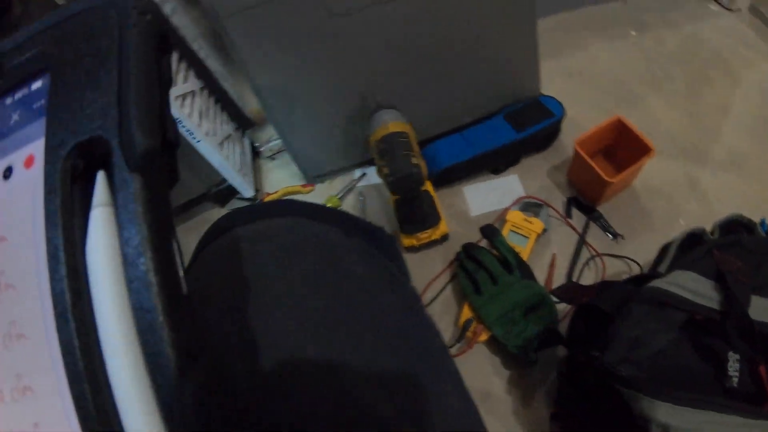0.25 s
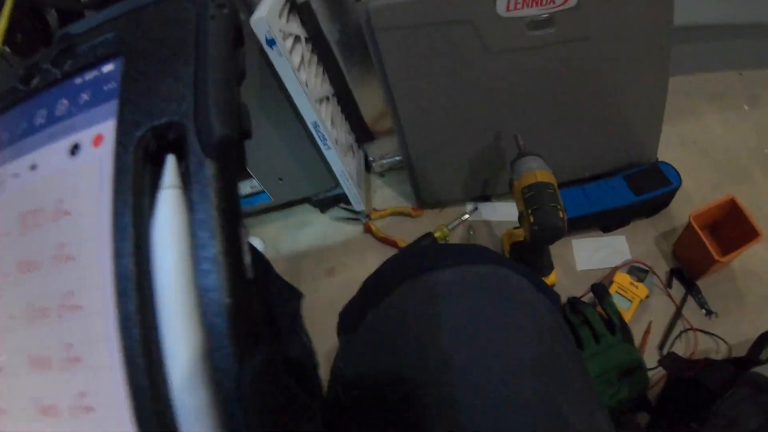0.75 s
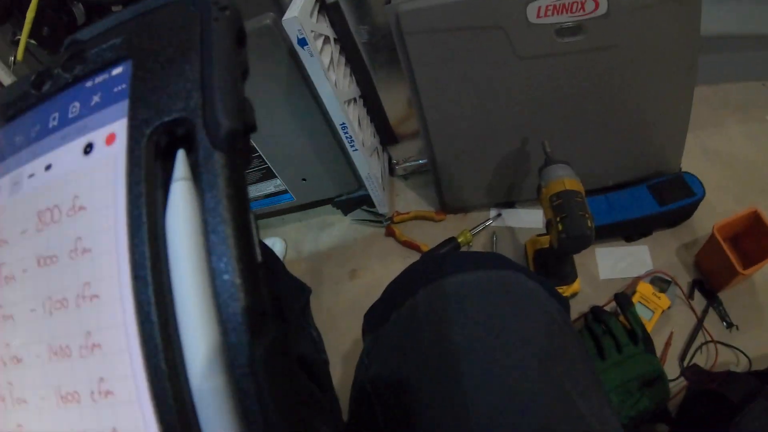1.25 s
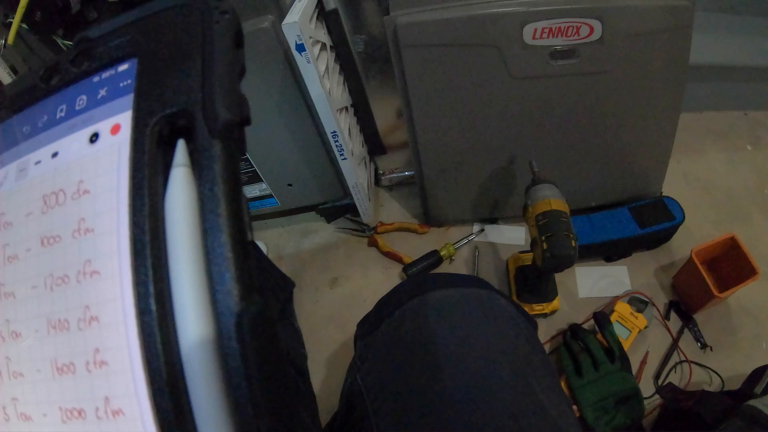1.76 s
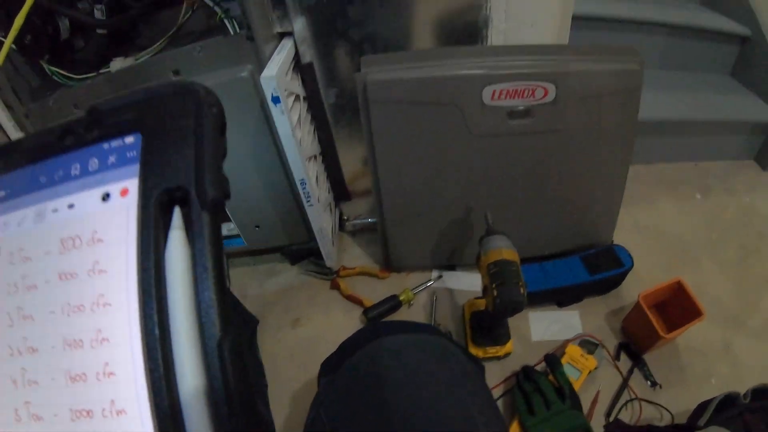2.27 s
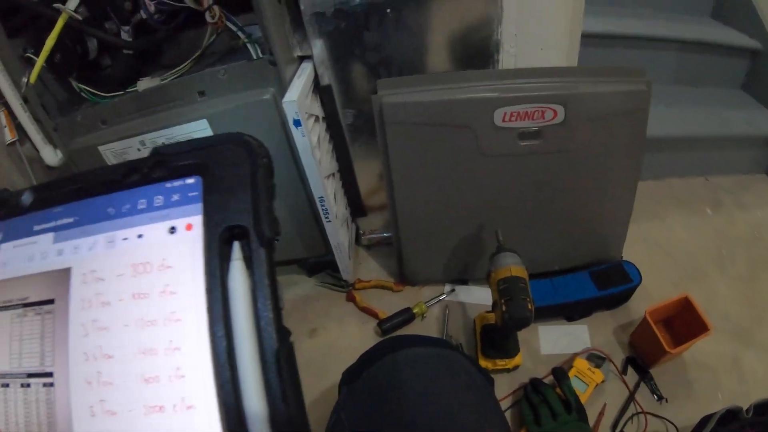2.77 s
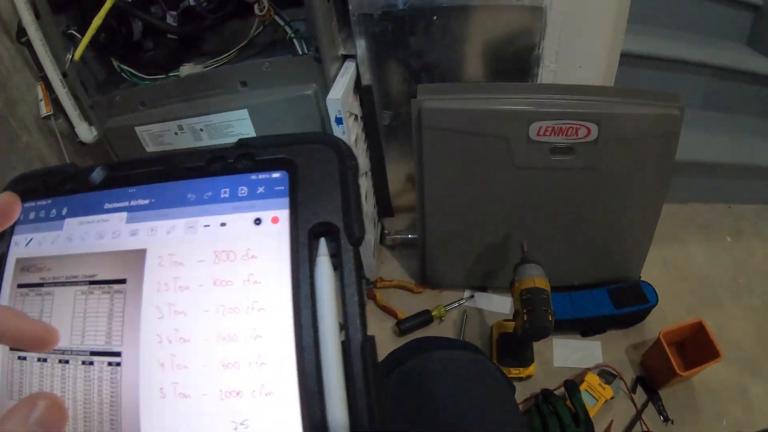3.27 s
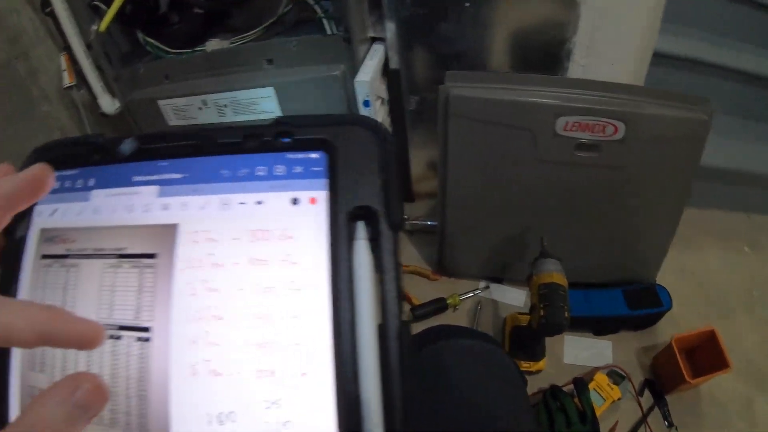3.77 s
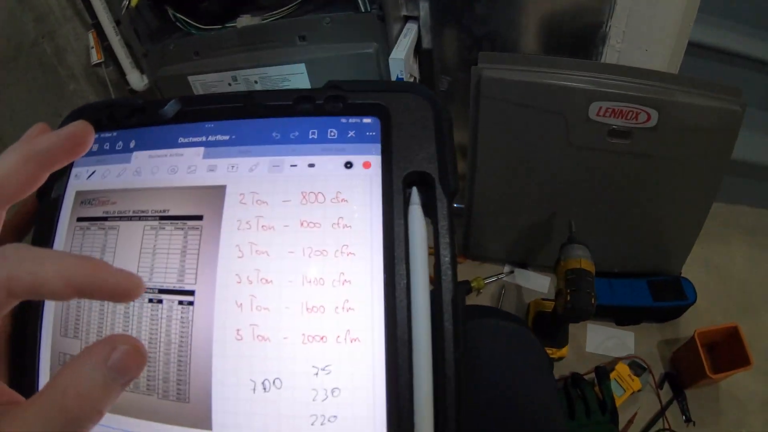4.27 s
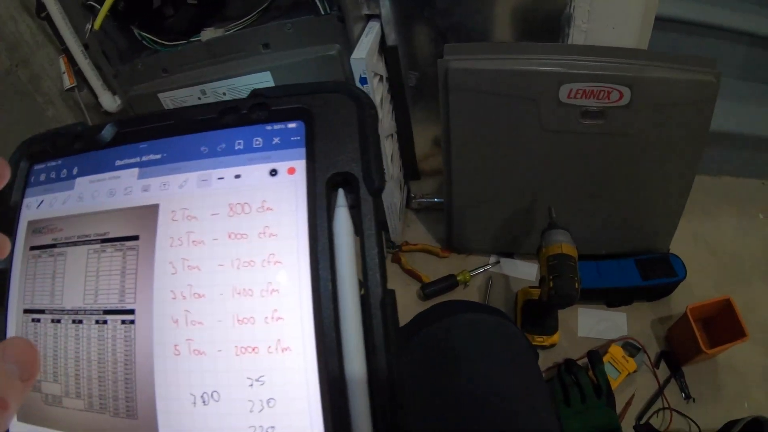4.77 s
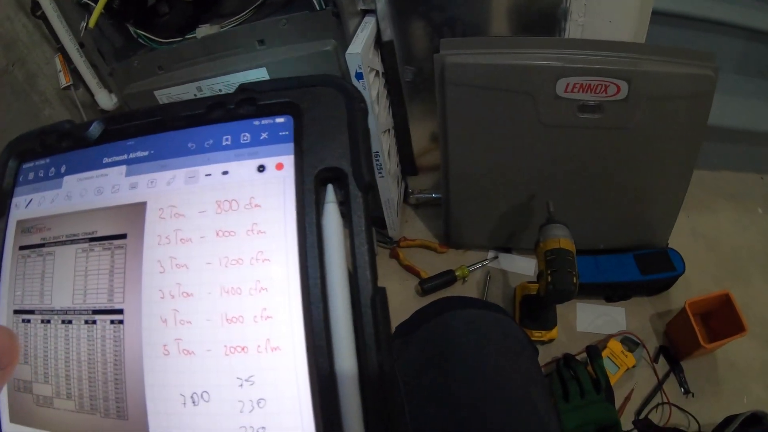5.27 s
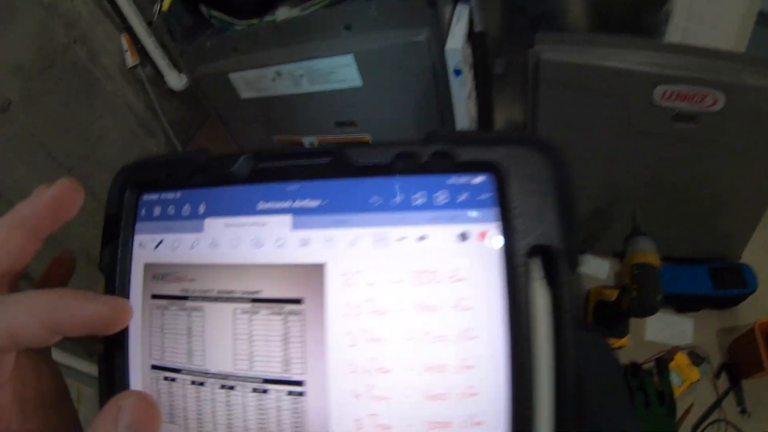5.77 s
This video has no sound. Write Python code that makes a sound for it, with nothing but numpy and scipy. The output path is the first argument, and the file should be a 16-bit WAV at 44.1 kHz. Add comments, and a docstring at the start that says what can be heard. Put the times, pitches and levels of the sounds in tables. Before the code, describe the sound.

Constant low duct roar and wavering hum close by, with soft bumps at the start, tapping mid-way and rougher handling rattles at the end.

```python
"""Furnace blower beside a body-worn camera

Air roars in the ducts: shaped noise at two side ports and a centre port, with faint motor sines.
A low hum near 98 Hz is a sine with random pitch and level flicker; filtered noise hisses at the very top.
The wearer shifts: noise through resonances creaks, thuds, rattles and drags cloth; decaying sines knock and tap.
The camera fades the roar band by band from its side ports to the centre port and back.
"""
import sys
import numpy as np
from scipy import signal
from scipy.io import wavfile
from scipy.ndimage import uniform_filter1d

SR = 44100
rng = np.random.default_rng(int(sys.argv[2]) if len(sys.argv) > 2 else 0)


def output_pcm(signal):
    """Save a mono or channel-first signal as 16-bit PCM at the path in sys.argv[1].

    Samples are clipped to [-1, 1] before scaling.
    """
    pcm = np.clip(np.atleast_2d(signal).T, -1, 1) * 32767
    wavfile.write(sys.argv[1], SR, np.round(pcm).astype(np.int16))


N = 265614
T = np.arange(N) / SR
HZ = np.maximum(np.fft.rfftfreq(N, 1 / SR), 1)


def undb(db):
    """Decibels to gain."""
    return 10 ** (np.asarray(db) / 20)


def columns(table, at, warp=lambda v: v):
    """Every column after the first, interpolated at the given places."""
    first, *rest = np.transpose(table)
    return np.array([np.interp(warp(at), warp(first), column) for column in rest])


def white():
    """Spectrum of a noise with 0 dB per Hz."""
    return np.fft.rfft(rng.standard_normal(N)) * np.sqrt(SR / 2)


def resonance(x, hz, width_hz):
    """Two-pole band-pass run twice, gain 1 at the centre."""
    b, a = signal.iirpeak(hz, hz / width_hz, SR)
    return signal.lfilter(b, a, signal.lfilter(b, a, x))


def bell(hz, centre_hz, width_hz):
    """Resonance-shaped weight, 1 at the centre and 0.5 at the edges of the width."""
    return 1 / (1 + (2 * (hz - centre_hz) / width_hz) ** 2)


def unit(x):
    """Scale to rms 1."""
    return x / np.sqrt(np.mean(x ** 2))


def smooth_twice(x, k):
    """Two running means of k samples."""
    return uniform_filter1d(uniform_filter1d(x, k), k)


def grains(rate_hz, spread_db):
    """Noise whose level takes a new random step rate_hz times a second, like stick and slip."""
    k = int(SR / rate_hz)
    step_db = spread_db * np.minimum(rng.exponential(size=N // k + 1), 3)
    level = np.repeat(undb(step_db), k)[:N]
    return uniform_filter1d(level, k) * rng.standard_normal(N)


def swells(table, rise_db_s, fall_db_s):
    """Gain over time per level column of (start, hold, dB, ..) rows: rise until start, hold, fall."""
    start, hold, *db = np.transpose(table)
    before_s = np.maximum(start[:, None] - T, 0)
    after_s = np.maximum(T - (start + hold)[:, None], 0)
    return undb(db) @ undb(-rise_db_s * before_s - fall_db_s * after_s)


def room(ripple_db, spacing_hz):
    """Basement reflections as fine spectral peaks and dips in dB, fading out below 500 Hz."""
    k = int(spacing_hz / HZ[-1] * len(HZ))
    ripple = smooth_twice(rng.standard_normal(len(HZ)), k)
    return ripple_db * unit(ripple) * np.clip(HZ / 500, 0, 1)


# Base air spectrum, side ports. Each row: frequency in Hz, left dB per Hz, right dB per Hz.
SIDE_AIR = [(25.3, -64.5, -80), (66.4, -46, -37.5), (83, -47.5, -43.5), (130, -47.5, -48.5),
            (205.3, -61, -53.5), (413, -74, -73.5), (583, -79.5, -74), (845, -80, -78.5),
            (1580, -79.5, -85), (2020, -82, -87), (2880, -86.5, -88), (4780, -91, -90.5), (6150, -86, -83),
            (7630, -94, -94), (11370, -110, -111)]
# Relation of the side ports. Each row: frequency in Hz, left lead in rad, likeness 0-1.
SIDE_PAIR = [(60, .01, 1), (127, .01, 0.97), (220, .01, 0.86), (420, 0.14, 0.54), (540, 2.17, 0.42),
             (880, 1.87, 1), (1460, 1.18, 0.95), (2100, 0.93, 0.3), (2730, .2, 0.5), (4600, .5, 0.9),
             (6260, 2.06, 0.3), (7500, 2, 0.1), (10500, 2.4, .05)]
# Base air spectrum, centre port. Each row: frequency in Hz, dB per Hz.
CENTRE_AIR = [(25, -86.5), (70, -53), (130, -52.5), (220, -57), (420, -74.5), (560, -82), (850, -82.5),
              (1500, -82.5), (2100, -88.5), (3000, -100.5), (4600, -88.5), (6300, -99.2), (7500, -109.2),
              (10500, -127.9)]
# Duct and cabinet resonances. Each row: frequency in Hz, width in Hz, lift at sides in dB, at centre in dB.
DUCT = [(70, 14, 3, 1), (98, 20, 5, 5), (120, 14, -2, -4), (138, 12, 2, 2), (155, 12, -2, -4),
        (200, 16, -2, -4), (380, 20, 3, 5), (650, 80, 3, 4), (1168, 40, 4, 3), (1480, 60, 3, 3),
        (175, 11, 6, 11), (224, 14, -4, -11), (241, 10, 3, 8), (276, 16, 10, 10), (294, 14, 0, -5),
        (311, 12, 2, 8), (325, 8, 0, -4), (337, 14, 0, 5), (352, 12, 0, -6), (851, 12, 6, 13),
        (565, 60, -11, -1), (1678, 32, 14, 2), (1715, 35, 6, 2), (1742, 36, -4, 8), (2180, 60, -4, 0),
        (1845, 40, 6, 2), (2070, 50, 4, 0), (2415, 35, 10, 3), (2392, 40, 0, 6), (3600, 500, 0, -4),
        (3920, 120, 0, 4)]
# Tones near mains multiples. Each row: frequency in Hz, level in dB over a 10 Hz slice of roar.
MOTOR = [(660, -8), (780, 3), (900.5, 11), (1020.5, 8.5), (1140, -4), (1622, 9.5)]


def roar():
    """Duct-coloured air noise plus motor sines at the left, right and centre port."""
    left_db, right_db = columns(SIDE_AIR, HZ, np.log)
    lead_rad, alike = columns(SIDE_PAIR, HZ, np.log)
    alike = np.clip(alike, 0, 1)
    side_db = sum(a * bell(HZ, f, w) for f, w, a, _ in DUCT)
    centre_db = sum(b * bell(HZ, f, w) for f, w, _, b in DUCT)

    phases = 2 * np.pi * rng.random(len(MOTOR))
    tones = sum(undb(db) * np.sin(2 * np.pi * f * T + phase) for (f, db), phase in zip(MOTOR, phases))
    shared = white() + np.fft.rfft(np.sqrt(20) * tones)  # sqrt(20): sine power equals 10 Hz of noise at 0 dB
    shared *= undb(room(ripple_db=1.2, spacing_hz=25))

    ports = []
    for air_db, sign in ((left_db, 1), (right_db, -1)):
        common = np.sqrt(alike) * shared * np.exp(.5j * sign * lead_rad)
        ports.append(undb(air_db + side_db) * (common + np.sqrt(1 - alike) * white()))
    ports.append(undb(columns(CENTRE_AIR, HZ, np.log)[0] + centre_db) * shared)
    return np.fft.irfft(ports, N)


# Share of the side ports. Each row: time in seconds, bass 0-1, middle 0-1, treble 0-1.
SIDE_SHARE = [(0, .6, .6, .15), (.2, .3, .4, .06), (.5, .1, .3, 0), (.6, .08, 0, 0), (.88, .04, 0, 0),
              (.92, 0, 0, 0), (2.76, 0, 0, 0), (2.83, .8, .5, .03), (3.0, 1, .7, .35), (3.3, 1, .8, .55),
              (3.7, 1, 1, 1), (6.02, 1, 1, 1)]
# Band corners in Hz: bass up to, middle from, middle up to, treble from.
SHARE_HZ = [110, 170, 2200, 3000]
# Roar level. Each row: time in seconds, rumble, body, rush and hiss in dB.
ROAR_DB = [(0, -5, -2.5, -7.5, -11), (.35, -12, -9.5, -2.5, -3), (.7, -4.5, -6, 2, 0.5),
           (1.1, -0.5, 1, 2, -1.5), (1.6, 1.5, -0.5, 3, 1), (2.1, 0.5, -1.5, 1, -0.5),
           (2.6, -3.5, 0.5, 3, 2), (3.0, -11.5, 2, 2, -1.5), (3.4, -2, 0.5, 1.5, -5.5),
           (3.8, -2.5, 4, 3.5, -5), (4.2, -7, 0.5, 2.5, -4.5), (4.6, -3.5, -1.5, 5, -4.5),
           (5.0, -2.5, 0, 3, -5), (5.4, -0.5, 1.5, 2, -3), (5.7, -4, 0.5, 7.5, -3.5), (6.02, 0, 10, 5, -2)]
# Centres in Hz of the four roar bands.
ROAR_HZ = [60, 260, 1300, 4500]
# Narrow bands of the roar that swell and fade. Each row: time in seconds, level of each band in dB.
NARROW_DB = [(0, -5, -4.5, 1.5), (1.0, -3.5, -6.5, -4), (1.9, 3, -3.5, -1), (2.3, -3, 5, 4.5),
             (3.2, 3, 3, 2), (3.6, -5, -4.5, -3), (4.1, -3, -1, 3.5), (4.4, -2, -0.5, -1.5),
             (4.9, -1, -6, 1), (5.35, 4, 1.5, 0), (5.5, -6.5, -1.5, 5), (6.02, -3, 0, -17)]
# Their places. Each row: frequency in Hz, width in Hz.
NARROW_HZ = [(1690, 110), (2415, 60), (610, 160)]


def blend(ports, flicker_db):
    """Fades between side and centre ports per band; broad and narrow bands and random flicker set the level."""
    hz, s, spectra = signal.stft(ports, SR, nperseg=1024)

    def spread(bands_hz):
        return np.array([np.interp(np.log(hz + 1), np.log(bands_hz), row) for row in np.eye(4)]).T

    share = spread(SHARE_HZ) @ columns(SIDE_SHARE, s)[[0, 1, 1, 2]]
    flicker = rng.standard_normal(spectra[0].shape)
    flicker = uniform_filter1d(flicker, size=40, axis=0)
    flicker = unit(uniform_filter1d(flicker, size=6, axis=1))
    narrow = np.array([bell(hz, f, w) for f, w in NARROW_HZ]).T
    level_db = spread(ROAR_HZ) @ columns(ROAR_DB, s) + narrow @ columns(NARROW_DB, s)
    gain = undb(level_db + flicker_db * flicker)
    mixed = share * spectra[:2] + (1 - share) * spectra[2]
    return signal.istft(gain * mixed, SR, nperseg=1024)[1][:, :N]


# Hand-set hum level before flicker and pan. Each row: time in seconds, rms level in dB.
HUM_DB = [(0, -78), (.47, -37.5), (.9, -51), (1.5, -34.5), (2.03, -59), (2.2, -32), (2.86, -35.5),
          (2.97, -21), (3.12, -43.5), (3.33, -15.5), (3.41, -29.5), (3.52, -26), (3.6, -52), (3.98, -21),
          (4.12, -37.5), (4.27, -22.5), (4.66, -20.5), (4.71, -36.5), (4.84, -18), (5.05, -25.5),
          (5.15, -24), (5.25, -32.5), (5.3, -18.5), (5.38, -17.5), (5.46, -42), (5.55, -33), (5.62, -24),
          (5.73, -29), (5.93, -18.5), (5.97, -45), (6.02, -23)]
HUM_HZ, HUM_WANDER_HZ, HUM_WANDER_PER_S = 97.9, 3, 12
HUM_FLICKER_DB, HUM_PAN_DB = 2.2, -3.5  # pan: left over right with the side ports open


def hum():
    """Low hum near 98 Hz: a sine with random pitch and level flicker over a hand-set level curve."""
    k = int(SR / HUM_WANDER_PER_S)
    bend, flicker = (unit(smooth_twice(rng.standard_normal(N), k)) for _ in range(2))
    pan_db = HUM_PAN_DB * columns(SIDE_SHARE, T)[0]
    db = columns(HUM_DB, T)[0] + HUM_FLICKER_DB * flicker + np.array([pan_db, -pan_db]) / 2
    phase = 2 * np.pi * np.cumsum(HUM_HZ + HUM_WANDER_HZ * bend) / SR
    return np.sqrt(2) * undb(db) * np.sin(phase)


# Hiss spectrum with the side ports closed. Each row: frequency in Hz, dB per Hz.
HISS = [(9000, -134), (11300, -128), (12300, -113), (13500, -114), (15500, -121)]


def hiss(sides_db=-17):
    """Electronic noise at the very top, unrelated left and right; weaker with the side ports open."""
    level = undb(columns(HISS, HZ, np.log)[0])
    noise = np.fft.irfft([level * white() for _ in range(2)], N)
    return undb(sides_db * columns(SIDE_SHARE, T)[2]) * noise


def muffle(x, edge_hz=7000):
    """Low-pass: the housing lets little treble through."""
    return signal.sosfilt(signal.butter(6, edge_hz, fs=SR, output="sos"), x)


# Soft blows. Each row: start in seconds, frequency in Hz, level in dB, t60 in seconds,
# left over right in dB, right lead in rad.
BUMPS = [(0.066, 56, -1, 0.13, -5.5, 1.75), (0.231, 339, -30.5, 0.089, -5, 0.12),
         (.25, 380, -36, 0.077, 0, 0.46), (.44, 336, -29, .1, -1, 0.22), (.457, 430, -34, 0.064, -3, 0)]
BUMP_RISE_S = .0038


def bumps():
    """Each soft blow on the housing rings one decaying sine, unlike in level and phase at the two ports."""
    out = np.zeros((2, N))
    for start_s, hz, db, t60, pan_db, lead_rad in BUMPS:
        t = np.maximum(T - start_s, 0)
        decay = undb(db + np.array([[pan_db], [0]]) - 60 * t / t60)
        ring = np.sin(2 * np.pi * hz * t + np.array([[0], [lead_rad]]))
        out += decay * np.minimum(t / BUMP_RISE_S, 1) * ring
    return out


# Wearer's shifts. Each row: start of hold in seconds, hold in seconds, thud, case boom and rattle in dB.
SHIFTS = [(.07, 0.0079, -41, -44.5, -58), (.22, 0.012, -37, -51, -49), (.45, 0.009, -43, -54, -49),
          (2.94, 0.031, -27.5, -37, -69.5), (3.2, 0.17, -39.5, -58.5, -71.5),
          (3.65, 0.033, -28.5, -35, -42), (3.83, 0.12, -28, -35, -40), (4.5, 0.044, -33, -32, -36.5),
          (4.82, .01, -33.5, -51, -59), (5.27, 0.12, -37, -47.5, -56.5), (5.46, 0.048, -31, -46, -34),
          (5.62, 0.077, -25.5, -23, -33.5), (5.8, 0.041, -21, -36, -41), (5.93, 0.032, -24.5, -20, -21.5),
          (5.99, 0.02, -23, -22, -38)]
SHIFT_RISE_DB_S, SHIFT_FALL_DB_S = 228.5, 161
# Case modes. Each row: frequency in Hz, relative level in dB, t60 in seconds.
CASE = [(265.7, 10.5, 0.027), (364, 2.5, 0.039), (760, -14, 0.019), (884, 5, 0.038), (1460, -11.5, 0.021),
        (1970, -15.5, 0.041), (3160, -16, 0.035), (3580, -21, 0.035)]
# Loose parts of the mount. Each row: frequency in Hz, width in Hz, relative level in dB.
RATTLE = [(427, 220, 4.5), (870, 160, 7), (1470, 260, -4), (1970, 500, -12.5)]
THUD_HZ, THUD_WIDTH_HZ, THUD_REST_DB = 48, 100, -71  # rest: floor added to the thud swells
BOOM_WIDTH_HZ = 100


def mount():
    """Creaks and taps flex the case, driving the ports in opposition; thuds are unrelated at each port."""
    thud, flex, shake = swells(SHIFTS, SHIFT_RISE_DB_S, SHIFT_FALL_DB_S)
    slips = grains(90, 3.0)
    boom = flex * unit(resonance(slips, CASE[0][0], BOOM_WIDTH_HZ))
    rattle = shake * unit(sum(undb(db) * resonance(slips, f, w) for f, w, db in RATTLE))
    thuds = [unit(resonance(rng.standard_normal(N), THUD_HZ, THUD_WIDTH_HZ)) for _ in range(2)]
    thuds = (thud + undb(THUD_REST_DB)) * undb([[-1.7], [3.3]]) * thuds
    flexing = np.outer([undb(-9.0), -undb(3.5)], boom + taps())
    sides_open = np.minimum(10 * columns(SIDE_SHARE, T)[0], 1)
    return sides_open * (flexing + np.outer([1, -1], rattle) + thuds)


# Cloth drags. Each row: start of hold in seconds, hold in seconds, scrape in dB, swish in dB.
DRAGS = [(.2, 0.063, -59.5, -57.5), (.415, 0.019, -54.5, -55), (.44, 0.067, -55, -52),
         (5.44, 0.03, -55, -49.5), (5.478, 0.033, -47.5, -47), (5.545, 0.027, -54, -50),
         (5.62, 0.0064, -50.5, -51), (5.908, 0.0095, -53, -47), (5.923, 0.0036, -39.5, -38),
         (5.933, 0.0051, -35, -42), (5.958, 0.026, -47, -51), (6.005, 0.013, -47, -47)]
DRAG_RISE_DB_S, DRAG_FALL_DB_S = 1299, 454
# Bands the cloth excites. Each row: frequency in Hz, width in Hz, side-port dB, centre-port dB.
CLOTH = [(340, 115, 6.5, 14), (870, 400, 3.5, 2.5), (1566, 370, 2, -1), (1880, 220, -1, -2),
         (2094, 85, -13, -0.5), (2960, 550, -5.5, -8.5), (3533, 120, -8, -12), (4540, 140, -16.5, -15),
         (4830, 1370, -12, -3.5), (5970, 630, -10, -25), (10000, 14000, -33, -27)]
FIBRE_HZ = 2600  # bands above follow the swish, others the scrape
SIDES_FROM_S = 2.76  # side-port levels apply after this, centre-port levels before


def cloth(side_gain=0.57):
    """Stick-slip noise through bands: fabric on the housing, unlike at the ports as far as they are open."""
    scrape, swish = swells(DRAGS, DRAG_RISE_DB_S, DRAG_FALL_DB_S)

    def rub():
        fibres = grains(150, 3.0)
        out = np.zeros(N)
        for f, w, sides_db, centre_db in CLOTH:
            drag = swish if f > FIBRE_HZ else scrape
            colour = undb(np.where(T > SIDES_FROM_S, sides_db, centre_db))
            out += drag * colour * unit(resonance(fibres, f, w))
        return out

    mid, side = rub(), rub()
    return mid + side_gain * columns(SIDE_SHARE, T)[1] * np.outer([1, -1], side)


# Small ticks. Each row: start in seconds, level in dB.
TICKS = [(.314, -42.5)]
TICK_HZ, TICK_WIDTH_HZ, TICK_T60_S = 4500, 3400, .03


def ticks():
    """Decaying band noise with a sudden start, the same at both ports."""
    out = np.zeros(N)
    for start_s, db in TICKS:
        t = np.maximum(T - start_s, 0)
        noise = unit(resonance(rng.standard_normal(N), TICK_HZ, TICK_WIDTH_HZ))
        out += undb(db - 60 * t / TICK_T60_S) * (t > 0) * noise
    return out


# Taps on the case. Each row: start in seconds, level in dB, brightness in dB per octave.
TAPS = [(3.68, -37, 3), (3.699, -28.5, -4), (3.769, -28.5, -0.5), (3.797, -31, 3), (3.823, -31, 0),
        (3.842, -31, -1), (3.852, -21, -0.5), (3.917, -27.5, -4), (3.948, -33, 0), (4.036, -21, 0),
        (4.08, -33.5, -6), (4.526, -28.5, -1.5), (5.546, -40, 6), (5.629, -25, -3), (5.696, -27, -1),
        (5.922, -23, 3), (5.932, -31, 12), (5.942, -33, 1), (5.947, -30, -12.5), (5.957, -31, 7),
        (5.966, -26, 5.5), (5.996, -30, 7)]
TAP_RISE_S, TAP_DETUNE = .0018, .025  # detune: standard deviation, fraction of frequency


def taps():
    """Each tap rings the case modes as decaying sines, slightly detuned; harder contact is brighter."""
    out, t = np.zeros(N + SR), T[:SR // 8]
    rise = (1 - np.exp(-t / TAP_RISE_S)) ** 2
    for start_s, db, tilt_db in TAPS:
        ring = np.zeros(len(t))
        for f, mode_db, t60 in CASE:
            mode_hz = f * (1 + TAP_DETUNE * rng.standard_normal())
            bright_db = tilt_db * np.log2(f / CASE[3][0])
            ring += undb(mode_db + bright_db - 60 * t / t60) * np.sin(2 * np.pi * mode_hz * t)
        first = int(start_s * SR)
        out[first:first + len(t)] += undb(db) * rise * ring
    return out[:N]


def scene():
    """All sources at the camera."""
    air = blend(roar(), flicker_db=1.06)
    return air + hum() + hiss() + muffle(bumps() + mount() + ticks()) + cloth()


CEILING, TOP_HZ = 0.82, 15700


def record(dry):
    """The camera rounds the loudest peaks and cuts the top."""
    rounded = CEILING * np.tanh(dry / CEILING)
    return signal.sosfilt(signal.ellip(8, .2, 70, TOP_HZ, fs=SR, output="sos"), rounded)


dry = scene()
out = record(dry)
output_pcm(out)
```